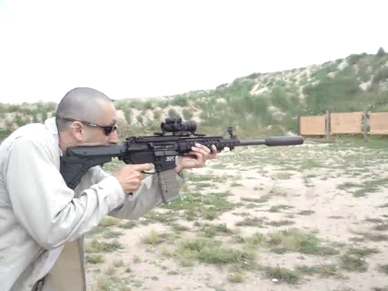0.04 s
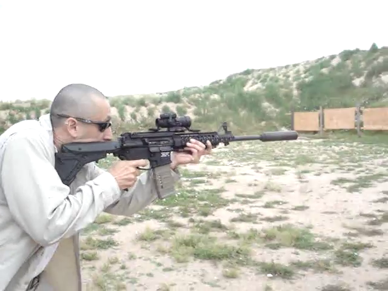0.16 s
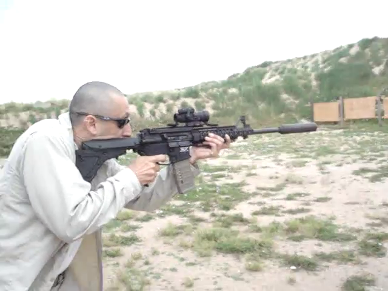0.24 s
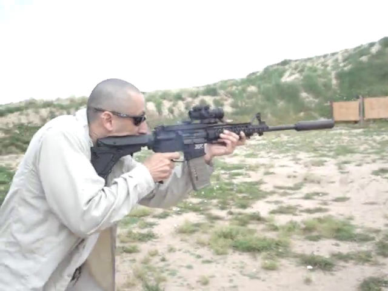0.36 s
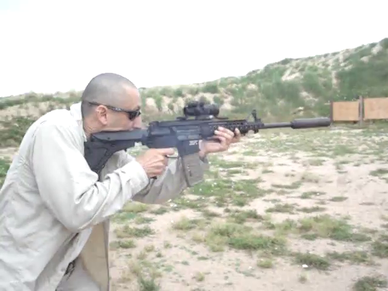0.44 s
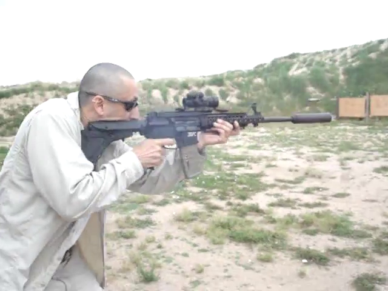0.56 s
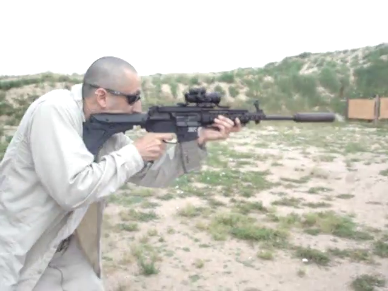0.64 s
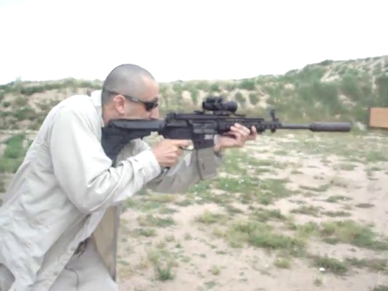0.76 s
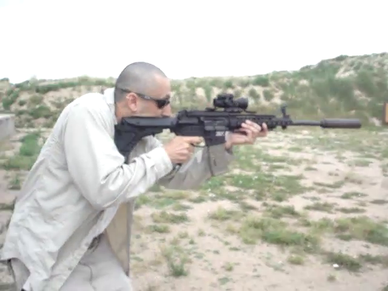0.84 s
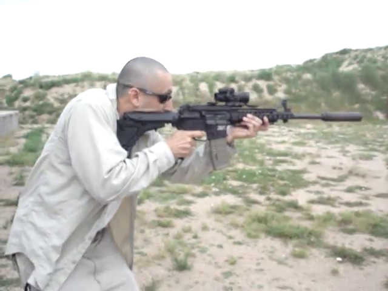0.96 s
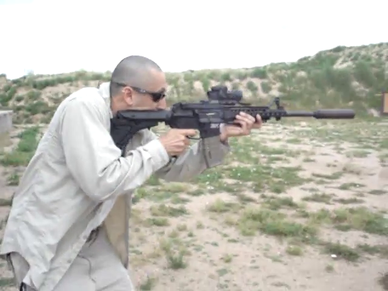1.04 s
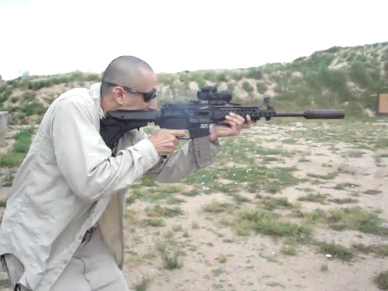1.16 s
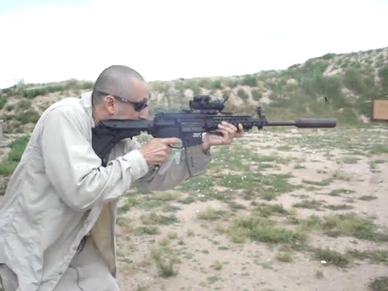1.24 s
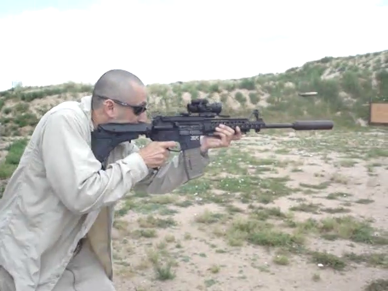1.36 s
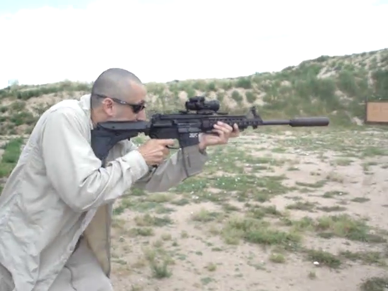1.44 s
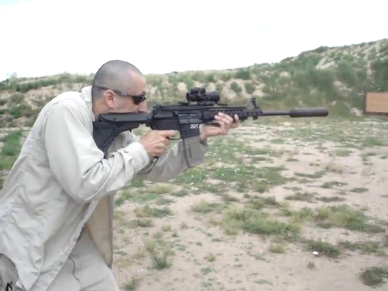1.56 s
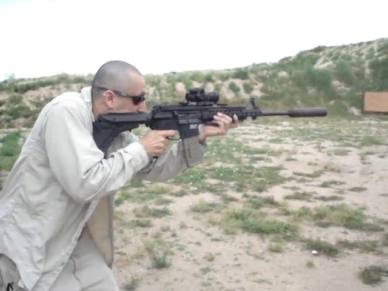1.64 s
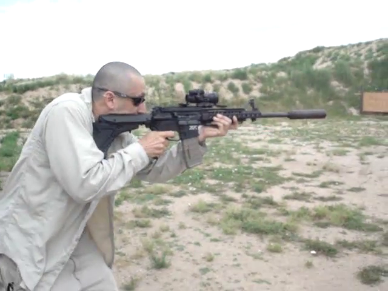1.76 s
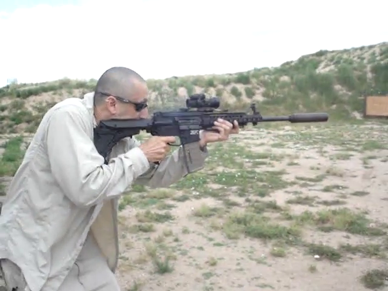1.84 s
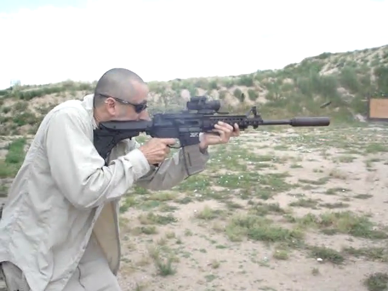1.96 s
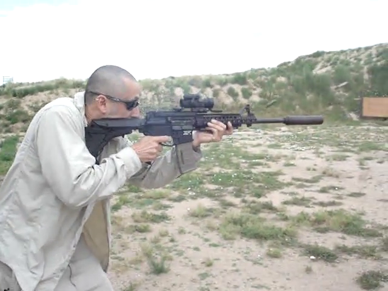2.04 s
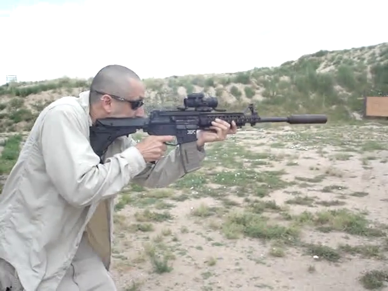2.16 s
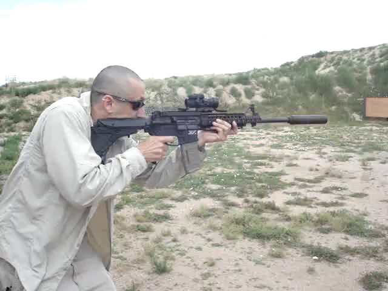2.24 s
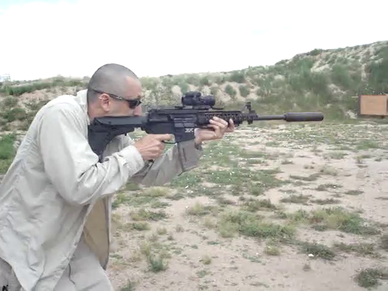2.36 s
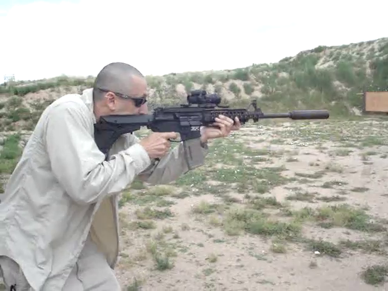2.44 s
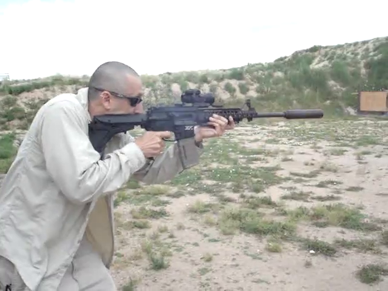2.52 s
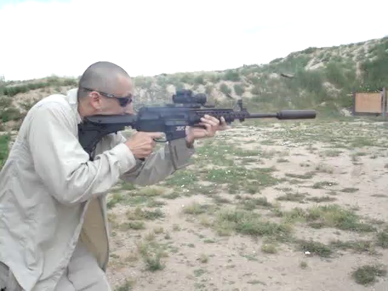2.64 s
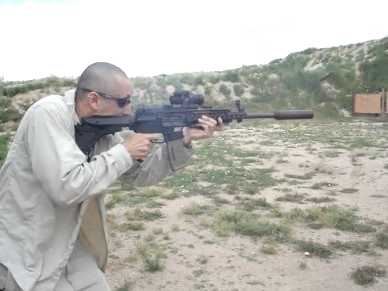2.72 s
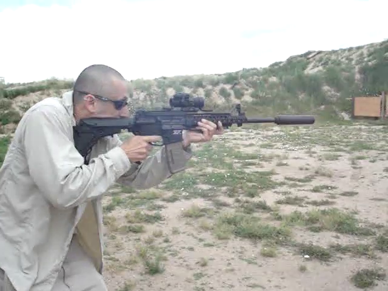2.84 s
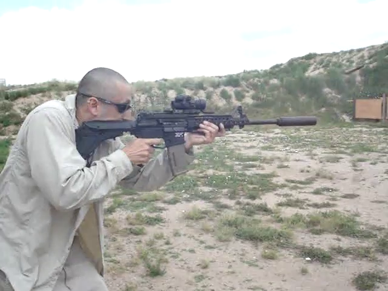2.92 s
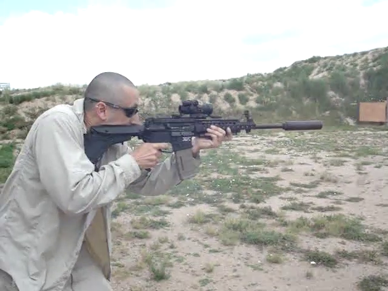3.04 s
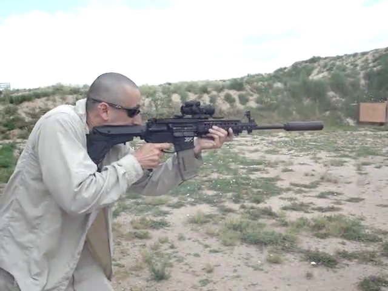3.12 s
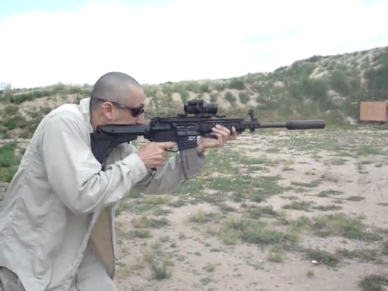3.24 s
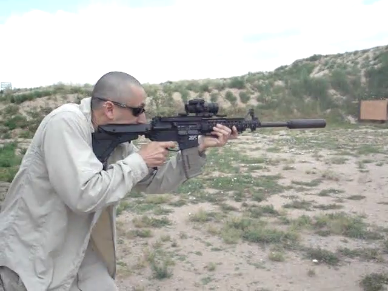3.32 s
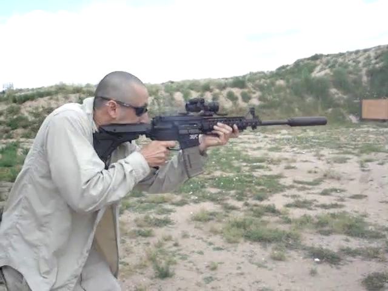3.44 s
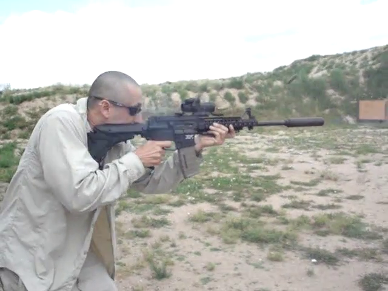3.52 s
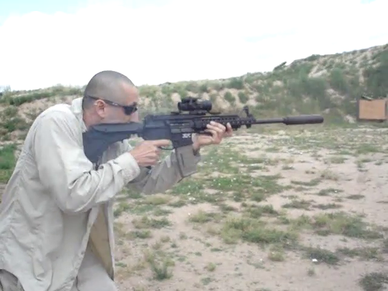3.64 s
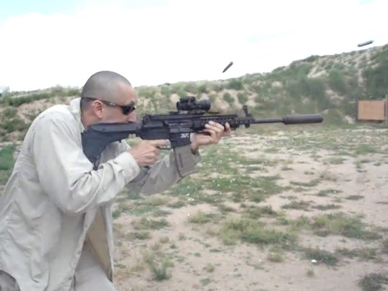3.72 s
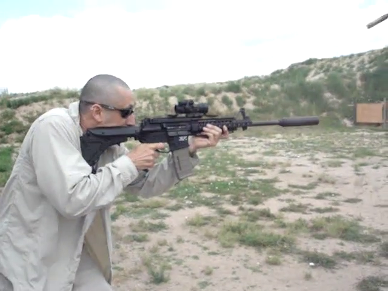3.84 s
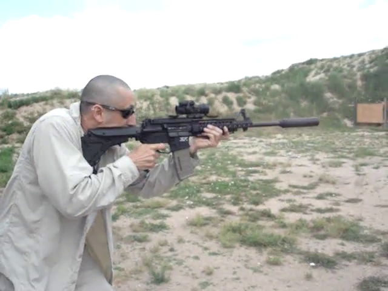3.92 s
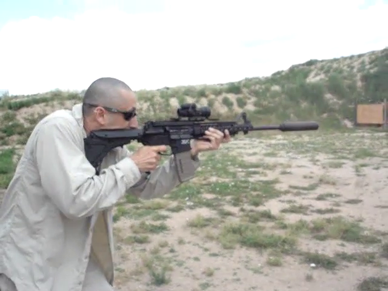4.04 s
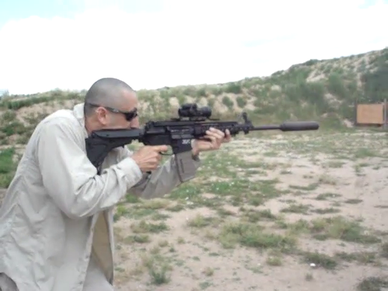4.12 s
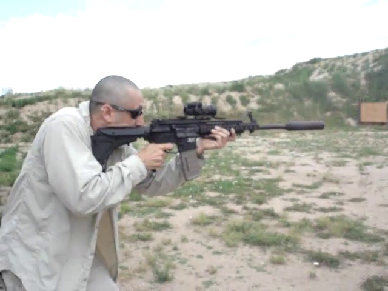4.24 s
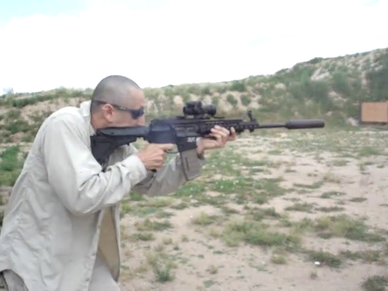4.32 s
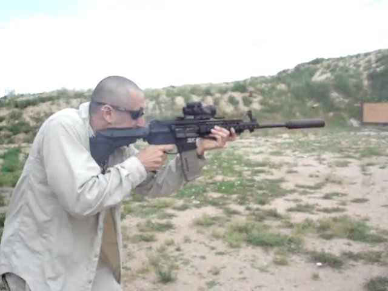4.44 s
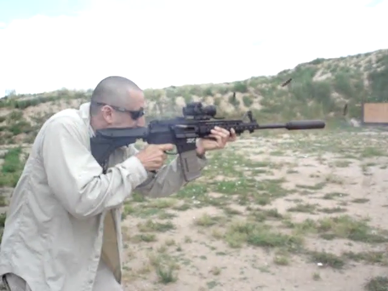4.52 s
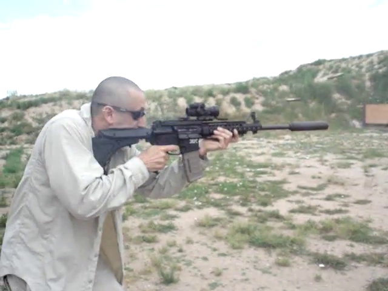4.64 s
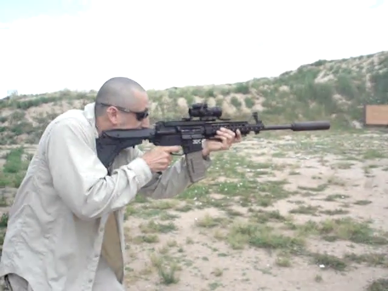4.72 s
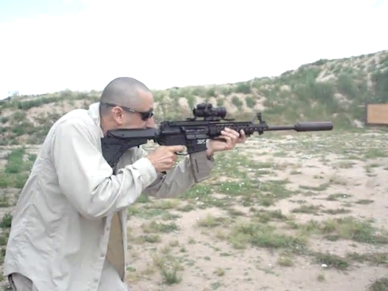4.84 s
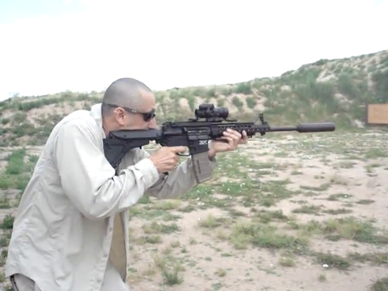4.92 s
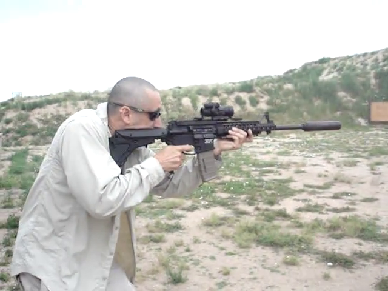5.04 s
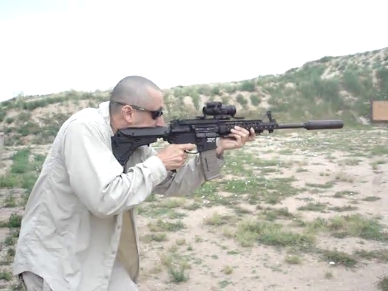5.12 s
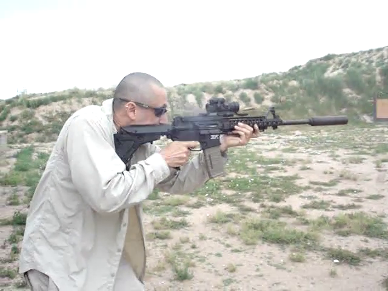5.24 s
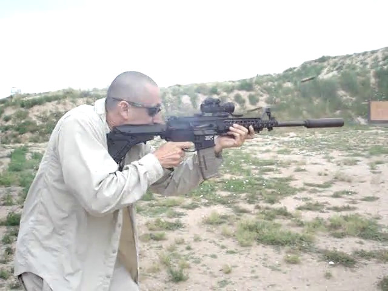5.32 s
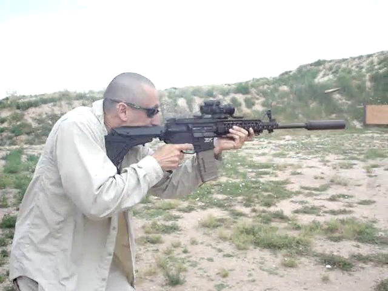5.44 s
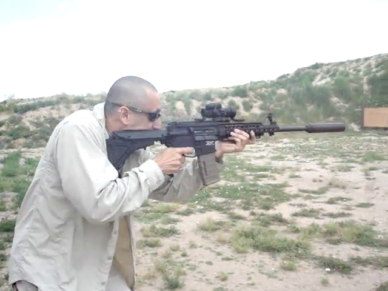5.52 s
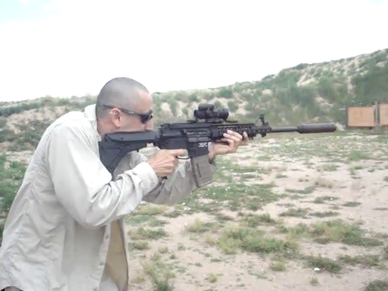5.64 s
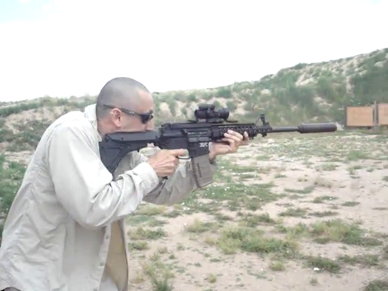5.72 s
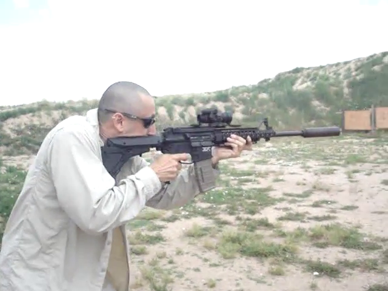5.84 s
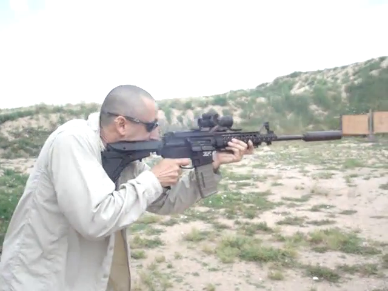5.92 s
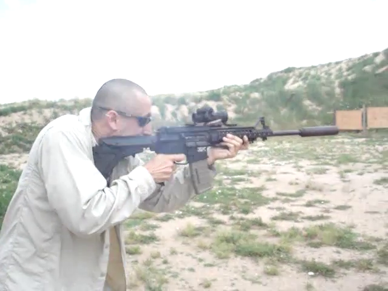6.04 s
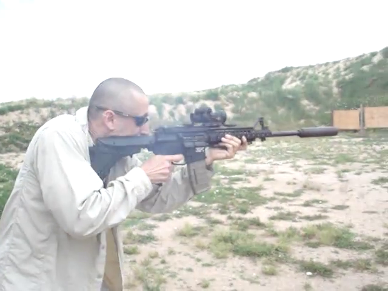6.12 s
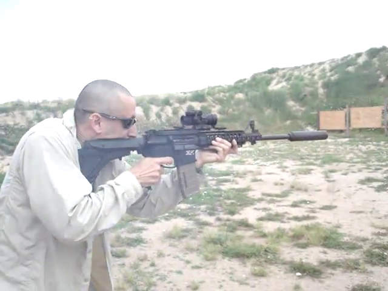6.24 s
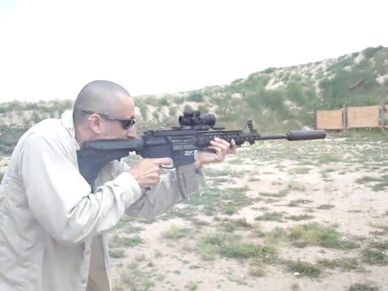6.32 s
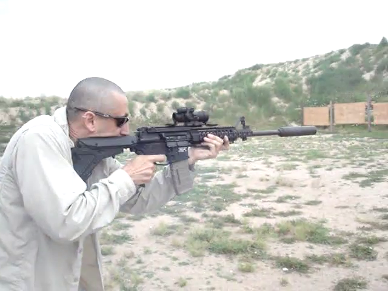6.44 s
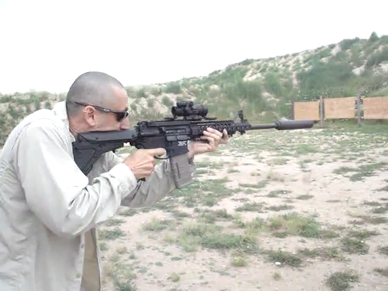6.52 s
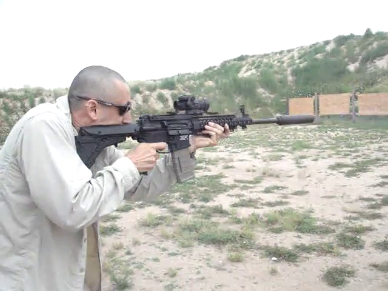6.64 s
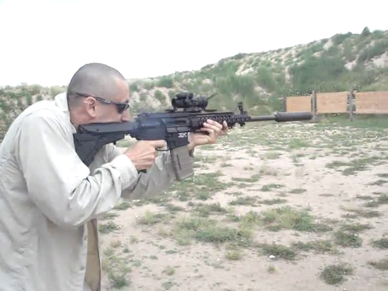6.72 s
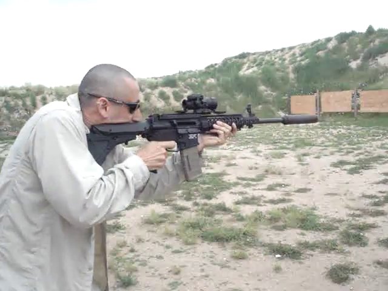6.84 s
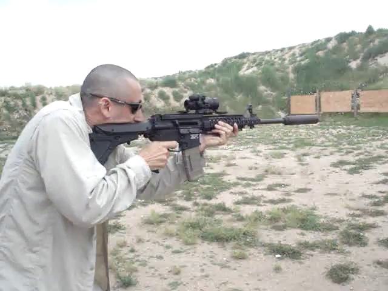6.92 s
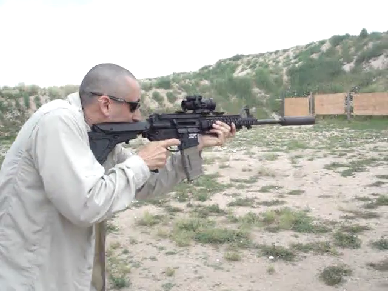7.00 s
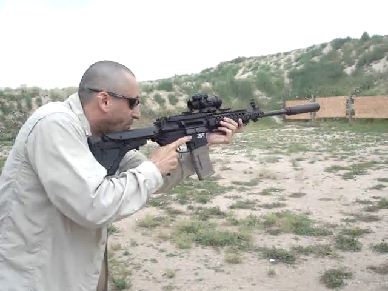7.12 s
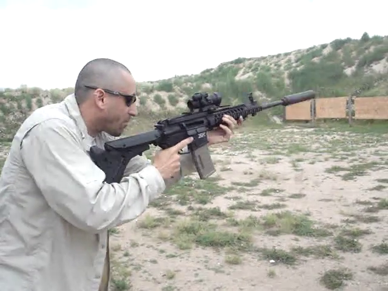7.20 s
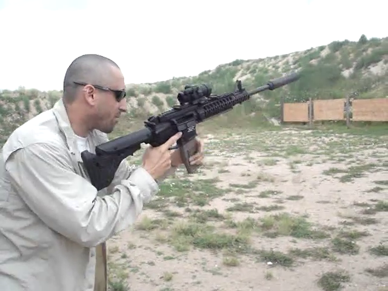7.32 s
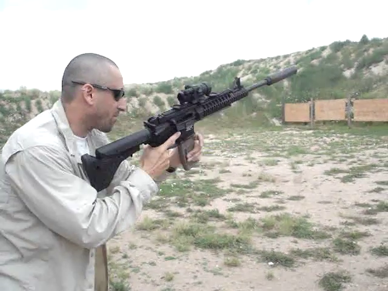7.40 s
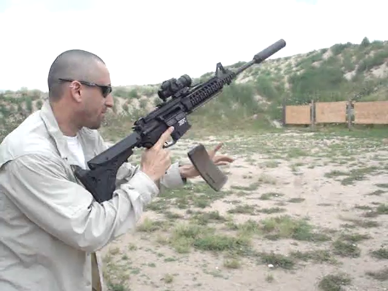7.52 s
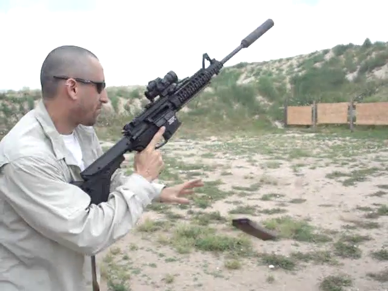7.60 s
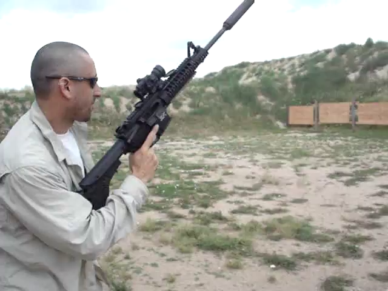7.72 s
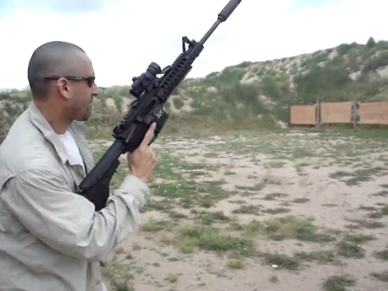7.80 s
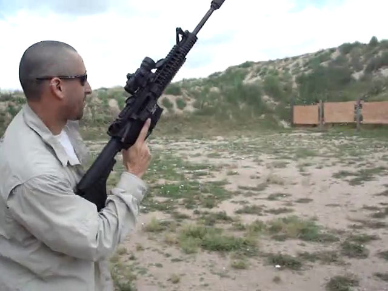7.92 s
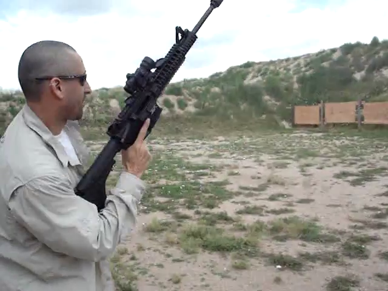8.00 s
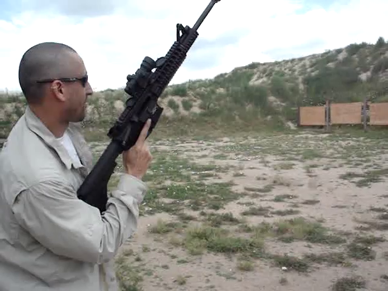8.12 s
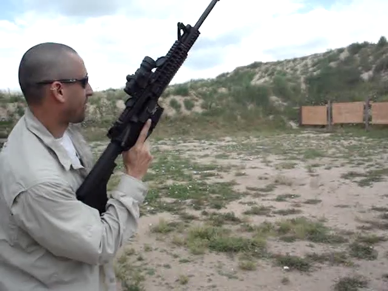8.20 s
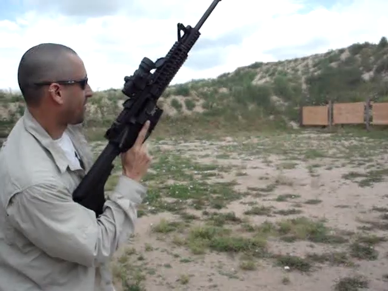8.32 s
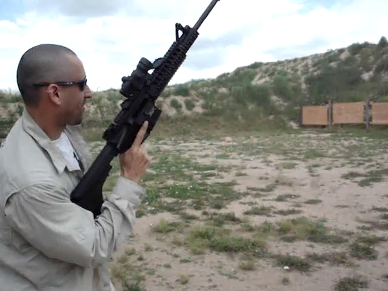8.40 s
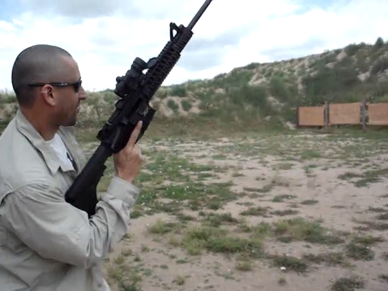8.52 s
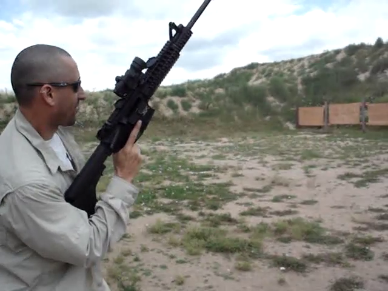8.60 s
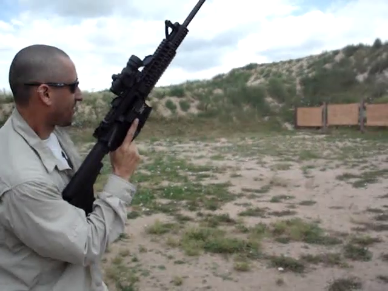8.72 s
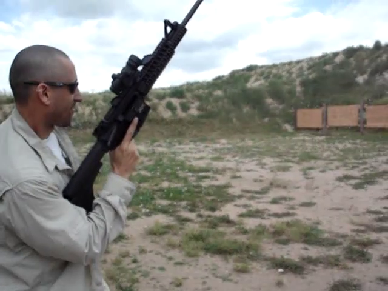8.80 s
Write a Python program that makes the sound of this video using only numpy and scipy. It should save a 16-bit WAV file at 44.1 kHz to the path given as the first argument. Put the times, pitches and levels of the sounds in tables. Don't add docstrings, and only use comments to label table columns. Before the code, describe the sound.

Outdoors, a suppressed automatic rifle fires nine quick bursts close by, echoes crackling back, before a plastic magazine clatters and wind thumps the microphone.

```python
import sys
import numpy as np
from scipy import signal
from scipy.fft import rfft, irfft
from scipy.io import wavfile
from scipy.ndimage import uniform_filter1d, minimum_filter1d

SR = 44100
rng = np.random.default_rng(int(sys.argv[2]) if len(sys.argv) > 2 else 0)


def bounce(signal):
    frames = np.transpose(np.atleast_2d(signal))
    limited = np.clip(frames, -1, 1)
    pcm = np.round(limited * 32767).astype(np.int16)
    wavfile.write(sys.argv[1], SR, pcm)


def amplitude_ratio(level_db):
    exponent = np.asarray(level_db, float) / 20
    return 10 ** exponent


N = 390726
TIME = np.arange(N) / SR


def unit(x):
    return x / np.sqrt(np.mean(x ** 2))


def noise():
    return rng.standard_normal(N)


def colour(points):
    hz, db = np.transpose(points)
    f = np.maximum(np.arange(N // 2 + 1) * SR / N, 1)
    gain = amplitude_ratio(np.interp(np.log(f), np.log(hz), db))
    return unit(irfft(rfft(noise()) * gain, N))


def band(x, lo_hz, hi_hz, order=2):
    return signal.sosfilt(signal.butter(order, [lo_hz, hi_hz], "band", fs=SR, output="sos"), x)


def spikes(s, db):
    out = np.zeros(N)
    at = np.clip((np.ravel(s) * SR).astype(int), 0, N - 1)
    np.add.at(out, at, amplitude_ratio(np.ravel(db)))
    return out


def ring(x, hz, t60):
    pole = np.exp(2j * np.pi * hz / SR - np.log(1000) / (t60 * SR))
    return signal.lfilter([1], [1, -pole], x).imag


def shape(s, db, curve):
    delay, level_db = np.transpose(curve)
    power = np.zeros(N)
    for at, size_db in zip(s, db):
        i = slice(max(int((at + delay[0]) * SR), 0), int((at + delay[-1]) * SR))
        power[i] += amplitude_ratio(2 * (size_db + np.interp(TIME[i] - at, delay, level_db)))
    return np.sqrt(power)


def course(curve):
    return shape([0], [0], curve)


def grain(rate, spread_db):
    k = int(SR / rate)
    steps = np.repeat(rng.standard_normal(N // k + 1), k)[:N]
    return amplitude_ratio(spread_db * uniform_filter1d(steps, k))


def even(x, edges_hz=(500, 1000, 1700, 2800, 4800), cycles=9):
    lows = [signal.sosfiltfilt(signal.butter(2, hz, fs=SR, output="sos"), x) for hz in edges_hz]
    out = lows[0]
    for hz, part in zip(edges_hz, np.diff(lows + [x], axis=0)):
        local_power = uniform_filter1d(part ** 2, int(cycles * SR / hz))
        out = out + part * np.sqrt(np.mean(part ** 2) / local_power)
    return out


# start t/s, end t/s, level/dB
LOW_STRETCHES = [(0.73, 0.794, -72), (0.828, 1.193, -68), (1.25, 1.47, -69), (2.05, 2.33, -76), (3.106, 3.283, -76),
                 (4.009, 4.203, -80), (4.892, 5.065, -73), (5.745, 5.934, -72), (6.429, 6.542, -71),
                 (6.662, 6.75, -80), (6.972, 7.058, -72), (7.386, 7.463, -67.5), (7.488, 7.574, -66.5),
                 (7.584, 7.649, -65.5), (7.667, 7.712, -62), (7.723, 7.883, -63.5), (7.88, 8.86, -62.5)]


def low_rumble():
    on = sum(amplitude_ratio(db) * ((TIME > start) & (TIME < end)) for start, end, db in LOW_STRETCHES)
    return amplitude_ratio(-3) * uniform_filter1d(on, int(.004 * SR)) * unit(band(noise(), 23, 210))


def drift():
    offset_db = 9
    creep = sum(amplitude_ratio(db + offset_db) * np.clip((TIME - start) / .046, 0, 1) * (TIME < end)
                for start, end, db in LOW_STRETCHES)
    since = np.maximum(TIME - .392, 0)
    surge = amplitude_ratio(-26.5) * np.minimum(since / .0032, 1) * np.exp(-since / .05)
    return uniform_filter1d(creep, int(.0021 * SR)) + surge


# f/Hz, level/dB
HISS = [(100, -40.5), (590, -25), (1000, -13.5), (2700, -6), (3070, -5), (7890, -6.5), (10000, -6.5),
        (10500, -24.5), (13600, -50), (22000, -120)]
# f/Hz, level/dB
MURMUR = [(15, -35), (25, -3), (70, -26.5), (391, -19), (479, -30.5), (525, -19), (830, -22), (2000, -25),
          (2600, -47.5), (4400, -120)]
# t/s, level/dB
STIR = [(0, -53), (.15, -52), (.25, -51), (.33, -54), (.4, -47), (.87, -73), (.9, -97)]
# start t/s, end t/s, level/dB
LULLS = [(1.603, 1.833, -0.5), (2.372, 2.569, -0.5), (.85, 1.1, 1.5), (7.19, 7.303, -3),
         (7.297, 7.375, -4.5), (7.648, 7.666, -5), (8.1, 8.86, 0)]


def background():
    swell_s = .095
    on = sum(np.clip((TIME - start) / min(swell_s, end - start), 0, 1) ** 2 * (TIME < end)
             for start, end, _ in LOW_STRETCHES)
    on = uniform_filter1d(on, int(.01 * SR))
    off_db, on_db = -77.5, -67
    hiss = amplitude_ratio(-64 + 1.5 * on) * grain(28, 1.8) * colour(HISS)
    murmur_level = amplitude_ratio(off_db + (on_db - off_db) * on) + course(STIR)
    murmur = murmur_level * grain(15, 3) * colour(MURMUR)
    lull_db = sum(db * ((TIME > start) & (TIME < end)) for start, end, db in LULLS)
    return (hiss + murmur) * amplitude_ratio(lull_db)


# t/s, level/dB
INSECT = [(0, -60), (.11, -56), (.13, -68), (.33, -62), (.36, -80)]


def insect():
    return course(INSECT) * grain(60, 5) * unit(band(noise(), 5350, 5850))


# t/s, level/dB
RUSTLE = [(0, -53), (.1, -50), (.2, -51.5), (.26, -49), (.33, -56), (.37, -100), (8.0, -100), (8.12, -63),
          (8.86, -65.5)]


def cloth():
    return course(RUSTLE) * grain(280, .77) * unit(band(noise(), 500, 2100, order=1))


# t/s, length/s, level/dB
CHIRPS = [
    (8.656, .012, -58),
    (8.686, 0.011, -56),
    (8.711, .018, -53),
]


def bird():
    start_hz, fall_hz_s = 5270, 16000
    out = np.zeros(N)
    for s, length, db in CHIRPS:
        t = np.arange(int(length * SR)) / SR
        tone = np.sin(2 * np.pi * t * (start_hz - fall_hz_s * t / 2))
        out[int(s * SR):][:len(t)] = amplitude_ratio(db) * np.sin(np.pi * t / length) * tone
    return out


# t/s, rumble level/dB, rough edge level/dB re rumble
GUSTS = [(8.106, -40, -20), (8.208, -35.5, -13.5), (8.28, -40, -14), (8.362, -29, -9), (8.455, -35, -29),
         (8.504, -38, 2.5), (8.578, -30, -19), (8.65, -42, -25), (8.74, -34, -29), (8.78, -31, -37),
         (8.841, -17, -20)]
# t/s, peak level/dB, f/Hz
POPS = [(8.107, -30.5, 175), (8.218, -28, 129), (8.225, -33, 231), (8.264, -32.5, 184), (8.349, -24.5, 142),
        (8.355, -12.5, 550), (8.363, -28, 220), (8.368, -17.5, 490), (8.374, -25, 265), (8.39, -36, 164),
        (8.403, -25.5, 240), (8.485, -19, 390), (8.492, -31, 203), (8.504, -18.5, 238), (8.511, -26, 205),
        (8.531, -27, 124), (8.568, -21, 334), (8.576, -34, 234), (8.588, -23, 275), (8.597, -23, 194),
        (8.611, -23, 259), (8.638, -23, 233), (8.656, -29, 120), (8.675, -28, 183), (8.735, -26, 164),
        (8.77, -28, 139.5), (8.822, -13.5, 183), (8.834, -8, 147), (8.846, -23.5, 160), (8.232, -39, 600),
        (8.341, -50, 1200), (8.3579, -29, 1230), (8.373, -29, 1090), (8.405, -36, 700), (8.495, -36, 800),
        (8.506, -38, 890), (8.534, -29, 550), (8.578, -47, 1200), (8.601, -33, 690), (8.742, -48, 600),
        (8.808, -52.5, 1900)]


def wind():
    s, db, edge_db = np.transpose(GUSTS)

    def gust(size_db, fall_db_s):
        return shape(s, size_db, [(-.054, -34), (0, 0), (.2, -.2 * fall_db_s)])

    lumps = grain(90, 6.5)
    rumble = unit(band(lumps * noise(), 71, 300))
    edge = unit(band(lumps * grain(300, 6) * noise(), 400, 1000, order=3))
    out = gust(db - 6, 167.5) * rumble + gust(db - 5 + edge_db, 449) * edge
    for at, peak_db, hz in POPS:
        t = np.linspace(0, 1, int(1.6 * SR / hz))
        i = int(at * SR)
        pop = np.sin(2 * np.pi * 1.64 * t ** .74) * np.sin(np.pi * t ** .77) ** 2
        out[i:i + len(t)] += amplitude_ratio(peak_db) * pop[:N - i]
    return out


# t/s, ring level/dB,
# ring f/Hz, bright crack level/dB, t60/s
KNOCKS = [(0.0555, -14, 993, -62.5, 0.11), (0.062, -7.5, 1089, -59.5, 0.035),
          (0.069, -21.5, 1160, -70, 0.25), (0.064, -22.5, 2640, -64.5, 0.093),
          (0.062, -32.5, 3800, -60.5, 0.054), (.11, -31, 1260, -61, .2), (.075, -32, 793, -71.5, 0.37),
          (.224, -35, 1390, -62, .04), (.259, -32.5, 1010, -62, 0.044), (.273, -38, 900, -68, .04),
          (0.056, -23, 337, -69, 0.15), (0.239, -33.5, 302.7, -71, 0.24), (0.325, -30, 1254, -64, .06),
          (.33, -29.5, 1220, -56, 0.057), (.331, -34, 1930, -58.5, 0.088), (.333, -32, 451, -71, .08),
          (.347, -38, 1520, -51, .02), (.36, -41, 800, -68, .03), (0.3712, -24, 1188, -18, 0.01),
          (.3715, -14, 3760, -39.5, .008), (1.118, -29.5, 4900, -69.5, 0.018),
          (1.1765, -21, 1880, -36, .01), (5.228, -45.5, 4780, -70, .012), (3.372, -59, 1990, -53, 0.011),
          (3.403, -57, 1290, -57.5, .012), (5.1, -60.5, 2480, -51, 0.011)]
# t/s, ring level/dB, ring f/Hz, bright crack level/dB, t60/s
MAGAZINE = [(7.25, -59.5, 1200, -66, 0.035), (7.396, -43.5, 1257, -56, 0.2), (7.416, -52, 1250, -57, 0.12),
            (7.437, -38, 1330, -49, 0.047), (7.441, -43, 2600, -54, .03), (7.447, -46, 1230, -59, 0.051),
            (7.49, -46, 1900, -64, 0.048), (7.525, -54, 1250, -62, 0.11), (7.562, -53, 2200, -55, .04),
            (7.487, -44, 1260, -55, 0.05), (7.54, -52.5, 1310, -61, 0.29),
            (7.601, -62.5, 1820, -64.5, 0.17), (7.82, -55, 895, -71.5, 0.059),
            (7.838, -52, 600, -72, 0.064), (7.85, -51, 1000, -70, 0.065), (7.9, -58, 1990, -67, 0.13),
            (7.981, -31, 1390, -24, 0.044), (7.984, -21.5, 2480, -28, 0.032), (7.988, -24, 1220, -30, 0.16),
            (7.998, -17.5, 1270, -17.5, 0.075), (7.9988, -20.5, 810, -37, 0.028),
            (8.005, -29, 1230, -38, 0.2), (8.166, -44, 1150, -49.5, 0.15), (8.152, -54, 1500, -54, .05),
            (8.197, -40, 1510, -40, 0.051), (8.21, -38.5, 1800, -38, 0.033)]


def knocks():
    out = np.zeros(N)
    for s, ring_db, hz, crack_db, t60 in KNOCKS + MAGAZINE:
        t = np.arange(int(t60 * SR)) / SR
        fade = amplitude_ratio(-60 * t / t60) * np.minimum(t / .0011, 1)
        wide = np.clip(.012 / t60, .14, .25)
        body = unit(band(rng.standard_normal(len(t)), hz * (1 - wide), hz * (1 + wide)))
        strike = 1.8 * np.sin(2 * np.pi * hz * t) * amplitude_ratio(-60 * t / .0097) * np.minimum(t * hz * 2, 1)
        crack = unit(band(rng.standard_normal(len(t)), 1700, 6700, order=3))
        i = int(s * SR)
        out[i:i + len(t)] += amplitude_ratio(ring_db) * (strike + .5 * fade * body) + amplitude_ratio(crack_db) * fade * crack
    return out


# t/s, bolt-back level/dB, closing delay/ms, closing level/dB, f/kHz muted above
LEAD_ROUNDS = [(0.406, -7, 59.7, -9, 11), (1.1281, -26.5, 63.6, -12, 3.5), (1.9126, -9.5, 60.8, -16, 11),
               (2.6187, -17.5, 59.7, -18.5, 11), (3.4966, -26, 64.3, -16, 4.4),
               (4.3866, -8.5, 54.3, -14, 11), (5.2391, -6, 53.9, -13.5, 2.5),
               (5.9999, -8, 52.7, -15.5, 4.3), (6.7746, -4.5, 55, -70, 11)]
# t/s, bolt-back level/dB, closing delay/ms, closing level/dB, f/kHz muted above
NEXT_ROUNDS = [(0.4771, -22, 62.1, -7.5, 11), (0.5492, -5.5, 66.7, -16.5, 6.5),
               (1.2012, -10.5, 80.6, -17, 11), (1.288, -30, 60.3, -17, 6.5), (1.9834, -19.5, 59.4, -19, 11),
               (2.0521, -18, 65.8, -28, 11), (2.6877, -10.5, 58.7, -19.5, 11),
               (2.7553, -32, 60.2, -19.5, 5), (2.824, -7, 59.8, -20, 7), (3.5693, -15.5, 59.6, -15.5, 6.5),
               (3.6387, -7, 57.3, -18, 11), (3.705, -10, 55.5, -18, 11), (4.4506, -6, 55.5, -12.5, 5),
               (4.5168, -7, 58.2, -17.5, 5), (4.5849, -22.5, 53.3, -17.5, 5.5),
               (5.3031, -25.5, 55.1, -16, 5), (5.3683, -6, 53.1, -16.5, 8), (5.4325, -19, 51.9, -17.5, 7),
               (6.0623, -8.5, 53.1, -13.5, 5.2), (6.1256, -11.5, 51.4, -15.5, 11),
               (6.1875, -14, 51.6, -16, 11), (6.2491, -17.5, 51.6, -18, 11)]


def rounds():
    return np.transpose(sorted(LEAD_ROUNDS + NEXT_ROUNDS) * np.array([1, 1, .001, 1, 1000]))


def muzzle():
    s = rounds()[0]
    return s, np.where(np.isin(s, np.array(LEAD_ROUNDS)[:, 0]), -4.5, -5.5)


# delay/s, level/dB
ECHOES = [(.039, -28), (.049, -30), (.0787, -24), (.0808, -19), (.094, -29), (.1232, -28), (.1343, -31),
          (.1491, -25), (.1675, -33), (.1706, -32), (.2033, -42), (.228, -40), (.2365, -38), (.2457, -43),
          (.2655, -47), (.2758, -37), (.2926, -45), (.3012, -47), (.319, -51)]
# t/s, near boards level/dB, far bank level/dB
RETURN = [(0.398, 3, 4.5), (1.201, 1, -2), (2.0, 1, -3.5), (2.699, -5, -5), (3.6, 0, -4), (4.5, -2, -4.5),
          (5.299, -5.5, -3), (6.099, -7, -6), (6.802, -1, -3.5)]
# t/s, peak level/dB
NEAR_SLAPS = [(0.4961, -8), (0.5072, -11), (0.5787, -15), (0.6389, -10), (0.6499, -14), (1.2293, -14),
              (1.3774, -14), (1.3884, -11), (2.0134, -14), (2.0725, -15), (2.0837, -18), (2.1416, -13),
              (2.1527, -18), (2.7082, -13), (2.7192, -19), (2.7772, -11), (2.7883, -21), (2.8457, -12),
              (2.8568, -18), (2.9143, -11), (2.9254, -19), (3.5968, -18), (3.66, -15), (3.6698, -24),
              (3.7285, -17), (3.7383, -24), (3.7942, -16), (3.8052, -18), (4.4754, -17), (4.4861, -21),
              (4.5405, -16), (4.5496, -23), (4.6072, -17), (4.6172, -28), (4.6742, -15), (4.6855, -23),
              (5.3283, -17), (5.339, -20), (5.3921, -17), (5.402, -19), (5.4576, -20), (5.4691, -22),
              (5.5206, -17), (5.5314, -21), (6.0896, -14), (6.1008, -24), (6.1527, -19), (6.1637, -20),
              (6.2158, -17), (6.2268, -15), (6.276, -24), (6.2885, -12), (6.3396, -18), (6.3505, -11),
              (6.8648, -16), (6.8757, -12)]
# t/s, peak level/dB
FAR_SLAPS = [(0.518, -4), (0.5684, -13), (0.5894, -13), (0.6389, -10), (0.6605, -12), (0.7121, -12),
             (1.24, -17), (1.3112, -22), (1.3641, -16), (1.3991, -22), (1.4508, -15), (2.0241, -19),
             (2.0736, -18), (2.0943, -21), (2.146, -21), (2.1633, -20), (2.2151, -17), (2.7299, -18),
             (2.7827, -26), (2.7991, -20), (2.8486, -24), (2.8675, -21), (2.9193, -29), (2.936, -21),
             (2.9876, -29), (3.6076, -16), (3.66, -15), (3.6807, -19), (3.7325, -21), (3.7498, -17),
             (3.8015, -21), (3.8161, -16), (3.8677, -21), (4.4966, -29), (4.5496, -23), (4.5612, -25),
             (4.6142, -23), (4.6272, -20), (4.6793, -22), (4.6959, -16), (4.7478, -23), (5.3501, -24),
             (5.4019, -17), (5.4134, -22), (5.4661, -19), (5.4795, -23), (5.5312, -17), (5.5423, -23),
             (5.5944, -18), (6.1093, -32), (6.1637, -20), (6.1744, -20), (6.2263, -21), (6.2885, -12),
             (6.3505, -11), (6.361, -25), (6.4126, -24), (6.8862, -22), (6.938, -27)]
# delay/s, level/dB
SLOPES = [(.01, -58), (0.071, -33), (.09, -36), (0.139, -37), (0.176, -41.5), (.212, -48), (.26, -56),
          (.305, -57.5), (.32, -70), (.4, -86)]
# f/Hz, level/dB
SLOPE_COLOUR = [(24, -49), (40, -29.5), (112, -27.5), (246, -12.5), (420, -21), (930, -17), (1070, -18),
                (2650, -6.5), (4600, -7.5), (6000, -14), (7400, -19), (9570, -28), (10500, -47),
                (13600, -77), (22000, -120)]


def echoes():
    s = rounds()[0][:, None]
    at, near_db, far_db = np.transpose(RETURN)
    near_db, far_db = np.interp(s, at, near_db), np.interp(s, at, far_db)
    delay, db = np.transpose(ECHOES)
    chance = rng.standard_normal((len(s), len(delay), 2))
    size_db = db + np.where(delay < .13, near_db, far_db) + 2.5 * chance[..., 1]
    hits = spikes(s + delay + .0002 * chance[..., 0], size_db + 1.5)
    at, peak_db = np.transpose(sorted(NEAR_SLAPS + FAR_SLAPS))
    lone = np.diff(at, prepend=0) > .001
    hits += spikes(at[lone] - .0002, peak_db[lone] + 5)
    n_wave = np.linspace(1, -1, int(.00026 * SR))
    slaps = band(np.convolve(hits, n_wave)[:N], 1800, 6200)
    smear = uniform_filter1d(np.abs(slaps), int(.0019 * SR))
    wash = shape(s[:, 0], far_db[:, 0], SLOPES) * grain(500, 4.6) * grain(90, 2.2) + .55 * smear
    return slaps + wash * colour(SLOPE_COLOUR)


# t/s, peak level/dB
HAMMER = [
    (0.397, -7.5),
    (1.905, -24),
    (2.609, -31.5),
    (3.49, -39),
    (5.9897, -33),
]


def bolt():
    s, back_db, close_s, close_db, _ = rounds()
    _, db = muzzle()
    back_s = s + .0086
    contacts = spikes(back_s - .001, back_db - 4) + spikes(back_s - .00055, back_db - 4)
    back = ring(contacts, 2250, .008) + ring(spikes(back_s - .0006, back_db - 4.5), 3100, .007)
    eject_s = s + .015 + .001 * rng.standard_normal(len(s))
    eject = ring(spikes(eject_s, db - 10), 2700, .0039)
    home_s, home_db = np.hstack([[s + close_s, close_db], np.transpose(HAMMER)])
    blow = shape(home_s, home_db, [(-.003, -24), (-.001, -7), (0, 0), (.002, -11), (.006, -28)])
    clank = band(noise(), 3000, 6700)
    clank /= np.sqrt(uniform_filter1d(clank ** 2, int(.0012 * SR)))
    return back + eject + blow * clank


def can():
    s, db = muzzle()
    ringing = ring(spikes(s - .001, db - 21), 620, .016) + ring(spikes(s - .001, db - 34), 750, .19)
    pop_hz, pop_db = 690, db - 4
    ground_s, ground_db = s + .0062, pop_db - 7

    def kick(at, size_db):
        return spikes(at - 1 / pop_hz, size_db - 6.5) + spikes(at, size_db)

    pop = ring(kick(s, pop_db) + kick(ground_s, ground_db), pop_hz, .009)
    thump = ring(spikes(s, db - 32.5) + spikes(s + .0042, db - 33.5), 150, .014)
    return band(ringing + pop, 220, 2500) + thump


# delay/s, level/dB
JET = [(-.008, -54.5), (-.0025, -32), (-.001, -12), (.002, -15), (.004, -17), (.006, -17), (.009, -16),
       (.012, -21.5), (.02, -25), (0.029, -32), (.062, -40.5)]
# f/Hz, level/dB
JET_COLOUR = [(24, -50), (60, -30.5), (311, -17), (600, -8), (1000, -7.5), (1350, -7.5), (2010, -5.5),
              (2980, -3.5), (3510, -5), (8130, -11), (9790, -18), (10500, -32), (13600, -68.5),
              (22000, -120)]
# t/s, level/dB
BLOWBY = [(.4, -59), (0.408, -19), (0.464, -13.5), (.472, -26.5), (.49, -30.5), (.51, -25.5), (0.532, -29)]


def gas_jet():
    s, db = muzzle()
    jet = shape(s, db + 6, JET) + course(BLOWBY)
    gas = jet * grain(900, 2.2) * even(colour(JET_COLOUR))
    treble = signal.sosfiltfilt(signal.butter(2, 6000, "high", fs=SR, output="sos"), gas)
    return gas - np.clip(1 - jet / amplitude_ratio(-23), 0, .85) * treble


def muzzle_crack():
    s, db = muzzle()
    crack = ring(spikes(s - .0005, db - 4) + spikes(s - .00024, db - 1.5), 3800, .005)
    return crack + ring(spikes(s - .0015, db - 8), 1700, .006)


def scene():
    surroundings = low_rumble() + background() + insect() + cloth() + bird() + wind()
    rifle = bolt() + can() + gas_jet() + muzzle_crack()
    return (surroundings + knocks() + echoes() + rifle)[None]


# start t/s, end t/s, f/Hz muted above
HUSHES = [(.38, .391, 700), (1.098, 1.116, 800), (1.891, 1.903, 1000), (2.574, 2.605, 2500),
          (3.473, 3.489, 300), (5.202, 5.225, 0), (5.957, 5.987, 2800), (6.749, 6.767, 0)]
# start t/s, end t/s, f/Hz muted above
DROPOUTS = [(.343, .367, 3000), (.524, .534, 5500), (1.817, 1.826, 2500), (2.713, 2.72, 4500),
            (6.31, 6.322, 5200), (6.811, 6.829, 5000), (7.323, 7.329, 1000), (7.333, 7.34, 1000),
            (7.352, 7.363, 0), (7.367, 7.377, 600), (7.468, 7.482, 400), (7.648, 7.672, 5200),
            (7.701, 7.708, 1500), (8.036, 8.046, 4500), (1.115, 1.124, 5900), (5.224, 5.234, 5600)]


def dry_spells():
    first = np.array(LEAD_ROUNDS)[:, 0]
    cycles = [(s + .027, s + close - .0055, hz, 1, 60 if s in first else 1.36)
              for s, _, close, _, hz in rounds().T]
    return [(*row, 0, 60) for row in HUSHES + DROPOUTS] + cycles


def starve(x, below_db=36, tilt_db=12, loud_db=-48, leak_db=-36, trace_db=-18):
    hz, t, z = signal.stft(x, SR, nperseg=384)
    group = np.arange(len(hz)) // 8
    group_hz = hz[group * 8][:, None]
    power = np.abs(z) ** 2
    band_db = 10 * np.log10(np.add.reduceat(power, np.arange(0, len(hz), 8)) / 8 + 1e-20)
    bright_db = 10 * np.log10(np.mean(power[hz > 2500], axis=0) + 1e-20)
    near_db = -minimum_filter1d(-bright_db, size=11)
    lately_db = -minimum_filter1d(-bright_db, size=41)
    need_db = near_db - below_db - 2 * np.maximum(loud_db - near_db, 0)
    luck = rng.standard_normal((len(band_db), len(t) // 3 + 1))
    luck = np.repeat(luck, 3, axis=1)[:, :len(t)]
    patchy_db = 6.5
    margin_db = (band_db - need_db + patchy_db * luck)[group] - tilt_db * group_hz / 10555
    ragged_hz = 600 * np.clip(luck[group], -1.5, .5)
    for start, end, edge_hz, creeping, short_db in dry_spells():
        stair_hz = 300000 * np.maximum(start + .006 - t, 0)
        edge = edge_hz + creeping * (stair_hz + ragged_hz)
        silent = (group_hz + 500 > edge) & (t > start - .008 * creeping) & (t < end)
        margin_db[silent] = np.minimum(margin_db[silent], -short_db)
    patch = np.repeat(luck[:, ::6], 6, axis=1)[:, :len(t)]
    dim = (patch[group // 2 * 2] < -.1) & (hz > 5300)[:, None]
    dim = dim & (lately_db > loud_db) & (bright_db < lately_db - 12)
    pits = (np.roll(luck, 13, axis=1)[group] < -.75) & (hz > 3000)[:, None]
    pits = pits & (near_db > loud_db) & (bright_db < lately_db - 9)
    tile_db = 3.5 * np.minimum(np.roll(luck, 7, axis=1), .5)[group]
    tiles = amplitude_ratio(tile_db * np.clip(hz / 3000, 0, 1)[:, None])
    leak = amplitude_ratio(leak_db + 16 * luck.mean(axis=0))
    least = np.where(margin_db > -50, np.clip(leak, amplitude_ratio(trace_db), 1), np.minimum(leak, 1))
    gate = np.clip(margin_db / 3 + .5, least, 1)
    z = z * tiles * amplitude_ratio(-9 * dim - 15 * pits) * gate
    return signal.istft(z, SR, nperseg=384)[1][:N]


def roll_off(x):
    return signal.sosfilt(signal.butter(12, 11330, fs=SR, output="sos"), x)


def record(dry):
    x = signal.sosfilt(signal.butter(1, 45, "high", fs=SR, output="sos"), dry[0])
    x = starve(np.tanh(.9 * x) / .9) + drift()
    ceiling = np.sign(x) * (.6 + .3 * np.tanh((np.abs(x) - .6) / .3))
    x = np.where(np.abs(x) > .6, ceiling, x)
    x = signal.sosfilt(signal.cheby2(12, 60, 10555 * 1.0685, fs=SR, output="sos"), x)
    return roll_off(x[None])


dry = scene()
out = record(dry)
bounce(out)
```